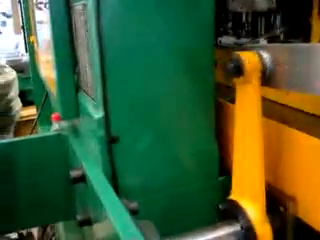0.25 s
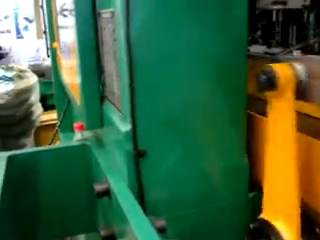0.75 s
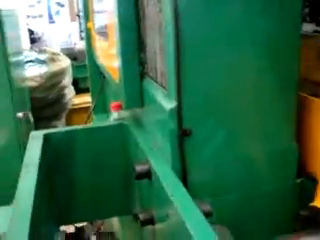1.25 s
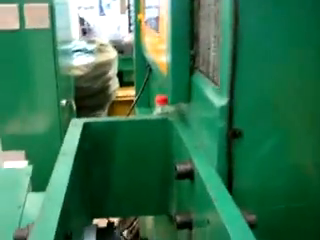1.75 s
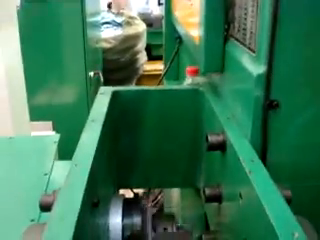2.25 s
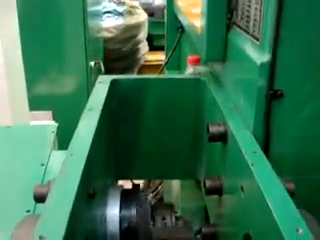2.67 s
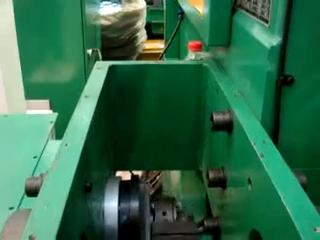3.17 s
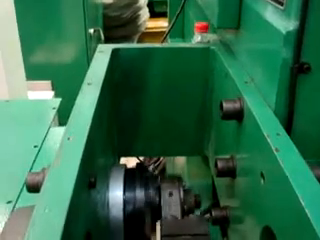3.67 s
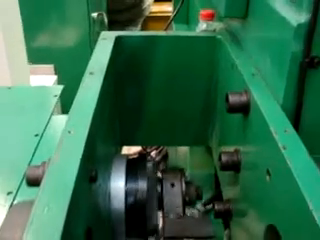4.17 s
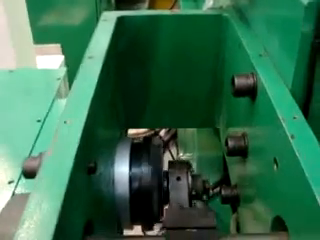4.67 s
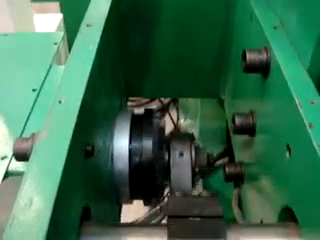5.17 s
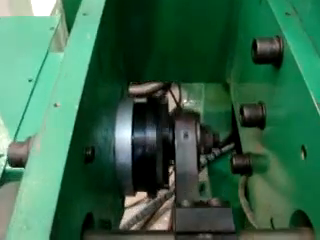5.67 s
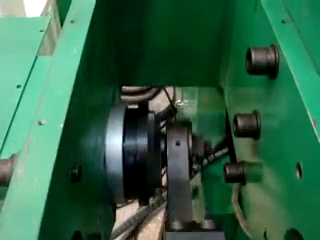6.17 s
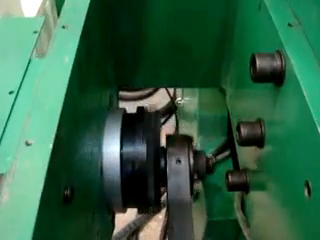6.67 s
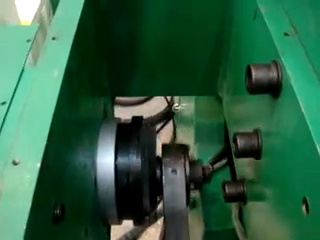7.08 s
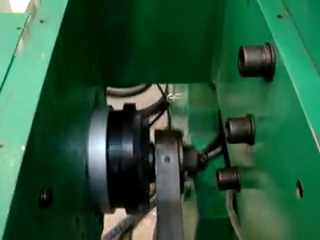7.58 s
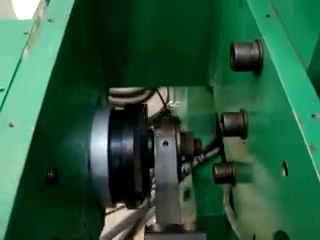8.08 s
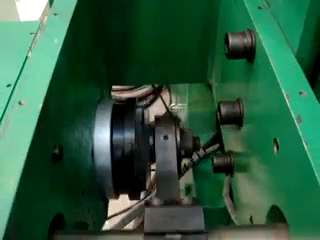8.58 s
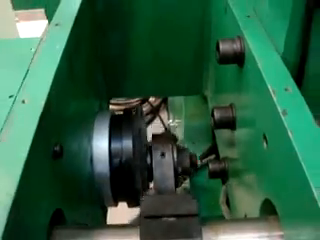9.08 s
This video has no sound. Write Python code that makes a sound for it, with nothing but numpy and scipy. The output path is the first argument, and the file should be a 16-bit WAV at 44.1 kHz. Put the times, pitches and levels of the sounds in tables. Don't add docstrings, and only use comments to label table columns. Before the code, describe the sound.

Rapid, steady machine clatter: tick, brief falling whistle, heavy steel punch and bright slap-back, repeating without pause over a low factory drone.

```python
import sys
import numpy as np
from scipy import signal
from scipy.fft import rfft, irfft
from scipy.io import wavfile
from scipy.ndimage import uniform_filter1d

SR = 44100
rng = np.random.default_rng(int(sys.argv[2]) if len(sys.argv) > 2 else 0)


def to_wav(s):
    ch = np.atleast_2d(s).T
    pcm = np.round(np.clip(ch, -1, 1) * 32767)
    wavfile.write(sys.argv[1], SR, pcm.astype(np.int16))


def voltage_ratio(level):
    return 10 ** (np.asarray(level, float) / 20)


N = 411453

FIRST_S, STROKE_S = .0434, .22070
STROKE_LIKENESS = .955

PUNCH_DB, RELEASE_DB, FEED_DB = (1.5, -1.5), (-2, -6), (0.7, 2.43)
HALL_DB, WORKS_SHIELD_DB = (2, -0.53), (2, -1)
SLIDE_DB = (-4, -8)
SLIDE_WIDTH_HZ = 250
WORKS_DB = -27

# t/s, way/0-1
PHONE_WAY = [
    (0, 0.32),
    (3.001, 0.5),
    (4.502, 0.6),
    (6, 0.8),
    (7.5, 1),
    (9.33, 0.89),
]

# t/ms from punch blow, level/dB, extra treble/dB, decay/ms
PUNCH_CONTACTS = [
    [(-5, -16, -3.5, 7.6), (1.5, -11, 1.5, 6.5), (6.5, -9, -5, 7.8), (17.5, -7, -8.5, 14),
     (31.5, -11, -9.5, 8)],
    [(-5, -23, 6, 5.2), (0, -8, -2.5, 9), (5.5, -9.5, 0.5, 7.1), (14, -7.5, -9.5, 10), (28, -13.5, -6, 14)],
]
RELEASE_CONTACTS = [
    [(40.2, -12, 4, 4.2), (43.3, -13, 5.5, 8.6), (51.7, -14, 0.5, 23), (68.8, -25.5, -0.5, 8),
     (109.8, -17, -21, 21)],
    [(38.2, -11.5, 6.5, 5.2), (43.03, -9.5, 6, 5), (51, -13, 3, 25), (71.8, -16.5, -7.5, 6.5),
     (109, -18, -8.5, 8)],
]
FEED_CONTACTS = [
    [(-33, -33.5, -0.5, 33), (-18.5, -29, 9.5, 15), (5, -31, 0.5, 17)],
    [(-36, -28.5, 4, 10), (-16.5, -26.5, 2, 42), (-3.5, -23.5, -6, 34)],
]
# t/ms, level/dB, extra treble/dB, decay/ms
PAWL_CONTACTS = [
    (-40.5, -30, 0, 8.2),
]
SLIDE_CONTACTS = [
    (-33.5, -26, 0, 10),
    (-16.5, -26, 0, 12),
]
# t/ms from punch blow, f/Hz
SLIDE_PITCH = [
    (-16, 5750),
    (-6.5, 4000),
]

# f/Hz, level/dB per Hz
PUNCH_COLOURS = [
    [(47, -48), (80, -24), (262, -11.5), (622, -6.5), (825, 4.5), (1510, -11.5), (1770, -9), (3440, -11.5),
     (8500, -22.5), (9790, -53), (12700, -78.5), (21500, -120)],
    [(47, -72), (80, -33), (198, -21), (327, -3.5), (648, 4), (1160, -6.5), (1390, -5), (1770, -4.5),
     (5140, -20), (9790, -90), (12700, -48.5), (21500, -120)],
]
RELEASE_COLOURS = [
    [(47, -60), (80, -37.5), (257, -12), (519, 1), (950, 5), (1600, -4), (2650, 1), (4380, -15),
     (6680, -10.5), (9790, -43.5), (12700, -77), (21500, -120)],
    [(47, -72), (80, -25), (284, -10), (416, -7), (717, -19), (1960, -5), (2600, -1.5), (3510, -12),
     (6950, -16), (9790, -24), (12700, -95.5), (21500, -120)],
]
# f/Hz, width/Hz, level/dB
PUNCH_MODES = [
    [(328, 40, 3), (548, 72, -2.5), (800, 1200, -22.5), (1070, 430, -5), (1475, 84, -1), (3200, 200, -8.5),
     (3470, 510, -8), (3880, 21, -19.5), (4230, 38, -12), (4300, 43, -17.5), (5140, 56, -7)],
    [(532, 6.7, 3.5), (678, 18, 4.5), (930, 5, -5.5), (1079, 41, 6), (1230, 55, -2.5), (1415, 130, -0.5),
     (1612, 140, -5.5), (1843, 19, -2.5), (2184, 300, -5.5), (3357, 20, -14.5), (3520, 61, -30.5),
     (4860, 86, -47), (4500, 120, -19.5)],
]
RELEASE_MODES = [
    [(1830, 340, -6), (1950, 37, -24), (2220, 110, -8), (2320, 10, -4.5), (2590, 53, -11), (3270, 61, -1.5),
     (3550, 310, -3.5), (3850, 68, -3)],
    [(336, 26, -2.5), (645, 17, -7.5), (835, 340, -4), (972, 36, 0.5), (1302, 350, -3), (1650, 28, -11.5),
     (1632, 220, -7), (2224, 130, -12), (2397, 130, -6.5), (2760, 170, -10), (2920, 39, -5.5),
     (3360, 20, -5), (3750, 190, -14.5)],
]
# f/Hz, level/dB per Hz
FEED_STEEL = [(600, -24), (1500, -3.5), (3000, -2), (5000, -3.5), (7000, -6.5), (9000, -11), (11000, -15)]
# f/Hz, width/Hz, level/dB
FEED_MODES = [(3850, 18, 3), (1330, 200, 1.5), (7660, 56, -8)]
PAWL_MODES = [(5520, 140, -3.5), (7600, 63, -7.5)]

# f/Hz, t60/s, level/dB
HALL_BANDS = [(144, 1, -5.5), (644, 0.39, -5), (1880, 0.31, -27.5), (5500, 0.28, -11)]
# f/Hz, level/dB per Hz
WORKS_COLOUR = [(25, -42.5), (214, -4), (1030, -5), (1300, -8.5), (2600, -16.5), (6000, -26.5),
                (10000, -26.5), (21000, -52.5)]
# f/Hz, width/Hz, level/dB
WORKS_MODES = [(270.3, 14, -2), (646, 280, 0), (1030, 26, -20)]


def punch():
    places = []
    for contacts, colour, modes in zip(PUNCH_CONTACTS, PUNCH_COLOURS, PUNCH_MODES):
        force = clatter(contacts, grit_db=1.5, same_low=1.0, same_hz=2240, rise_ms=0.6)
        places.append(ring(force, body(colour, modes, 1.5)))
    return places


def release():
    places = []
    for contacts, colour, modes in zip(RELEASE_CONTACTS, RELEASE_COLOURS, RELEASE_MODES):
        force = clatter(contacts, grit_db=0.56, same_low=.9, same_hz=5220, rise_ms=0.66)
        places.append(ring(force, body(colour, modes, 3.7)))
    return places


def feed():
    pawl_force = clatter(PAWL_CONTACTS, grit_db=2., same_low=0.68, same_hz=8300, rise_ms=0.8)
    pawl = ring(pawl_force, body(FEED_STEEL, PAWL_MODES, 4.1))
    steel = body(FEED_STEEL, FEED_MODES, 0.)
    whistle = slide()
    places = []
    for contacts, whistle_db in zip(FEED_CONTACTS, SLIDE_DB):
        scrape = clatter(contacts, grit_db=-0.5, same_low=0.37, same_hz=4900, rise_ms=6.9)
        places.append(pawl + voltage_ratio(whistle_db) * whistle + ring(scrape, steel))
    return places


def slide():
    t_s = np.arange(N + 2 * SR) / SR - 1
    ms = (((t_s - FIRST_S) / STROKE_S + .5) % 1 - .5) * STROKE_S * 1000
    turns = np.cumsum(np.interp(ms, *np.transpose(SLIDE_PITCH))) / SR
    noise = rng.standard_normal((2, len(t_s)))
    a, b = (unit(uniform_filter1d(v, int(SR / SLIDE_WIDTH_HZ))) for v in noise)
    whistle = a * np.cos(2 * np.pi * turns) + b * np.sin(2 * np.pi * turns)
    return envelope(SLIDE_CONTACTS, ms, 2.3, 0) * whistle


def clatter(contacts, grit_db, same_low, same_hz, rise_ms, split_hz=1700):
    lead, size = SR // 20, SR // 5
    ms = (np.arange(size) - lead) * 1000 / SR
    hz = np.fft.rfftfreq(size, 1 / SR)
    starts_s = np.arange(FIRST_S - 3 * STROKE_S, N / SR + STROKE_S, STROKE_S)
    grains = rng.standard_normal((2, len(starts_s), size))
    habit, fresh = unit(grains * voltage_ratio(grit_db * rng.exponential(size=grains.shape)))
    for k in range(1, len(starts_s)):
        habit[k] = STROKE_LIKENESS * habit[k - 1] + np.sqrt(1 - STROKE_LIKENESS ** 2) * habit[k]
    share = np.clip(same_low, 0, 1) / (1 + (hz / same_hz) ** 2)
    force = irfft(np.sqrt(share) * rfft(habit) + np.sqrt(1 - share) * rfft(fresh), size)
    low = 1 / (1 + 1j * hz / split_hz) ** 2
    soft = rfft(force * envelope(contacts, ms, rise_ms, 0))
    hard = rfft(force * envelope(contacts, ms, rise_ms, 1))
    both = low * soft + (1 - low) * hard
    power = uniform_filter1d(np.mean(np.abs(both) ** 2, axis=0), size=16)
    rows = irfft(both * np.sqrt(power.mean() / power), size)
    rows = rows * voltage_ratio(0.98 * rng.standard_normal((len(starts_s), 1)))
    out = np.zeros(N + 2 * SR)
    for start_s, row in zip(starts_s, rows):
        i = SR + int(start_s * SR) - lead
        out[i:i + size] += row
    return out


def envelope(contacts, ms, rise_ms, treble):
    shape = 0
    for at_ms, db, treble_db, decay_ms in contacts:
        since = np.maximum(ms - at_ms, 0)
        swing = (1 - np.exp(-since / rise_ms)) * np.exp(-since / max(decay_ms, .5))
        shape = shape + voltage_ratio(db + treble * treble_db) * swing
    return shape


def body(colour, modes, mode_db, size=8192):
    hz = np.fft.rfftfreq(size, 1 / SR)
    power = voltage_ratio(2 * over_hz(colour, hz))
    for f, width, db in modes:
        power = power + voltage_ratio(2 * (db + mode_db)) / (1 + (2 * (hz - f) / max(width, 12)) ** 2) ** 2
    cepstrum = irfft(np.log(power) / 2)
    cepstrum[1:size // 2] *= 2
    cepstrum[size // 2 + 1:] = 0
    h = irfft(np.exp(rfft(cepstrum)))
    return h / np.sqrt(np.sum(h ** 2))


def ring(x, h):
    return signal.oaconvolve(x, h)[:len(x)]


def unit(x):
    return x / np.sqrt(np.mean(x ** 2))


def over_hz(points, hz):
    f, v = np.transpose(points)
    return np.interp(np.log(hz + 1), np.log(f), v)


def hall(x, count=4):
    way = np.clip((np.arange(len(x)) - SR) / N, 0, 1) * (count - 1)
    out = 0
    for k in range(count):
        fade = np.cos(np.clip(way - k, -1, 1) * np.pi / 2)
        out = out + fade * ring(x, tail())
    return out


def tail():
    t_s = np.arange(SR) / SR
    out = 0
    for hz, t60_s, db in HALL_BANDS:
        band = signal.butter(1, [hz / 2, hz * 1.5], "bandpass", fs=SR, output="sos")
        decay = np.exp(-np.log(1000) * t_s / t60_s) * (1 - np.exp(-t_s / 0.046))
        noise = signal.sosfilt(band, rng.standard_normal(SR))
        out = out + voltage_ratio(db) * noise * decay / np.linalg.norm(decay)
    return out


def works():
    noise = ring(rng.standard_normal(N + SR), body(WORKS_COLOUR, WORKS_MODES, -4.5))[SR:]
    swell_db = unit(uniform_filter1d(rng.standard_normal(N), SR // 4))
    return voltage_ratio(WORKS_DB + swell_db) * unit(noise)


def scene():
    t_s = np.arange(N + 2 * SR) / SR - 1
    inside = np.clip(np.interp(t_s, *np.transpose(PHONE_WAY)), 0, 1)
    turn = inside * np.pi / 2

    def gain(ends_db):
        return voltage_ratio(ends_db[0] + inside * (ends_db[1] - ends_db[0]))

    def move(places, ends_db):
        return gain(ends_db) * (np.cos(turn) * places[0] + np.sin(turn) * places[1])

    press = move(punch(), PUNCH_DB) + move(release(), RELEASE_DB) + move(feed(), FEED_DB)
    machine = press + gain(HALL_DB) * hall(press)
    background = gain(WORKS_SHIELD_DB)[SR:SR + N] * works()
    return (machine[SR:SR + N] + background)[None]


def band_limit(x):
    return signal.sosfilt(signal.butter(12, 9940, fs=SR, output="sos"), x)


def record(dry):
    x = np.tanh(1.206 * dry[0]) / 1.111
    highpass = signal.butter(2, 95, "highpass", fs=SR, output="sos")
    mix = signal.sosfilt(highpass, x)[None]
    return band_limit(mix)


dry = scene()
out = record(dry)
to_wav(out)
```